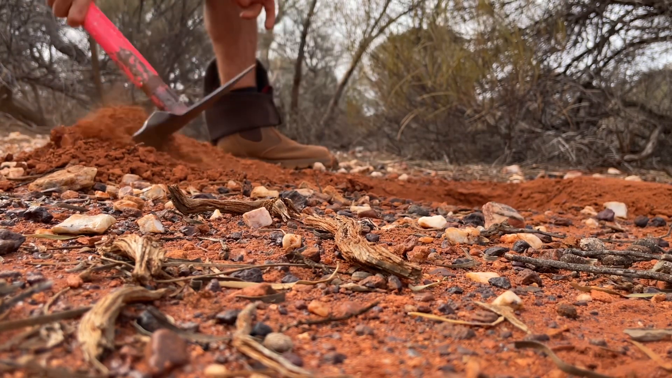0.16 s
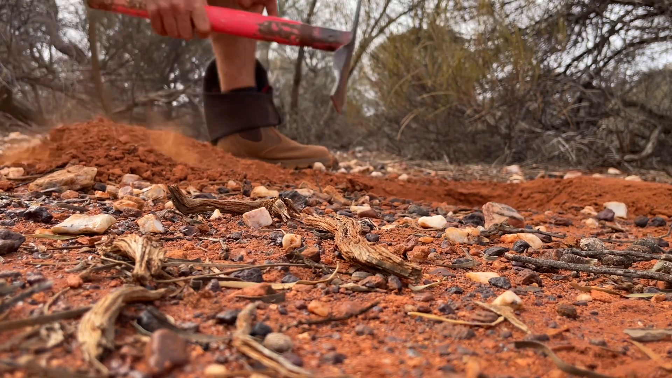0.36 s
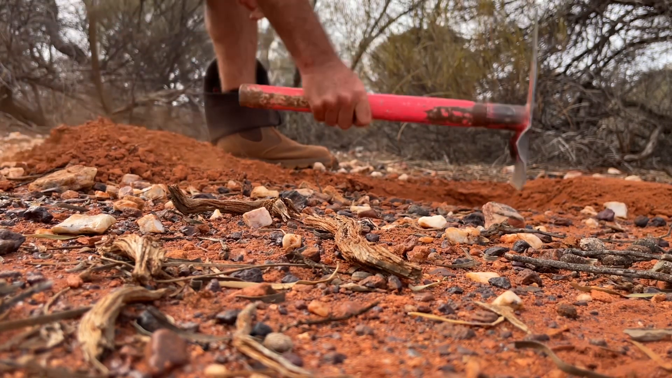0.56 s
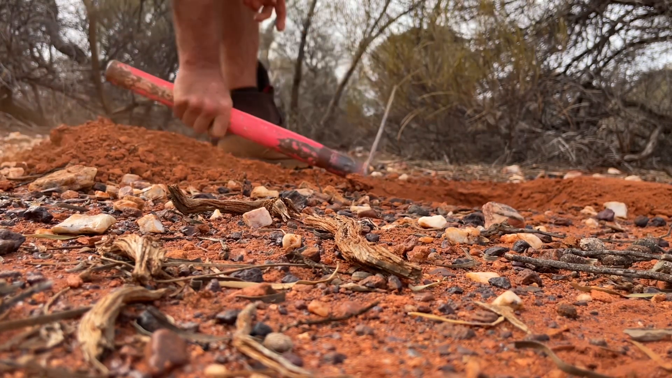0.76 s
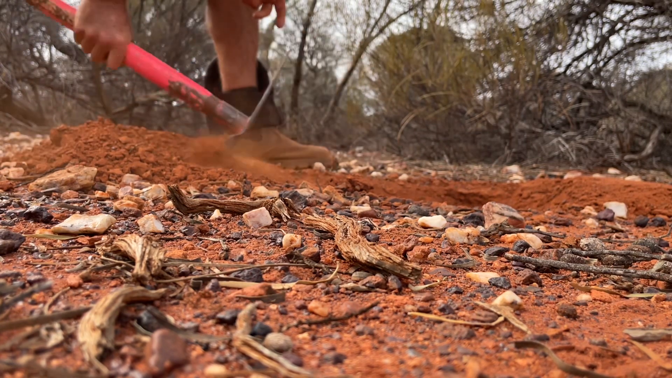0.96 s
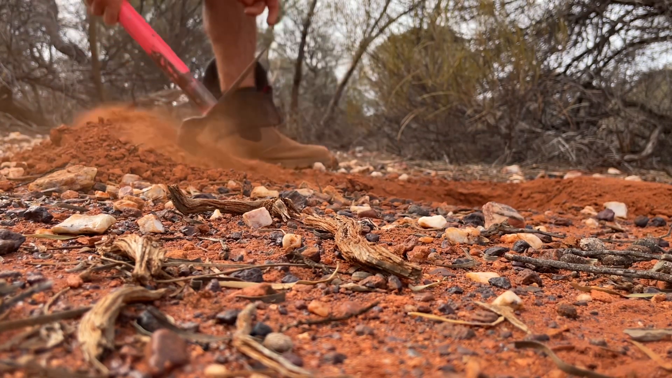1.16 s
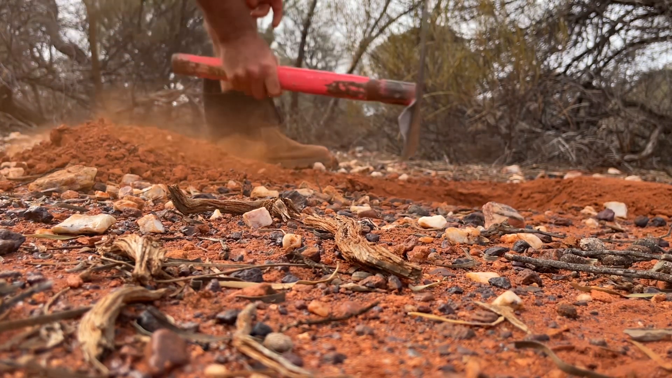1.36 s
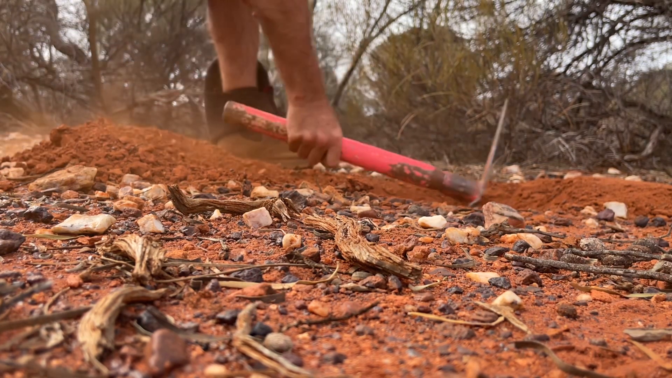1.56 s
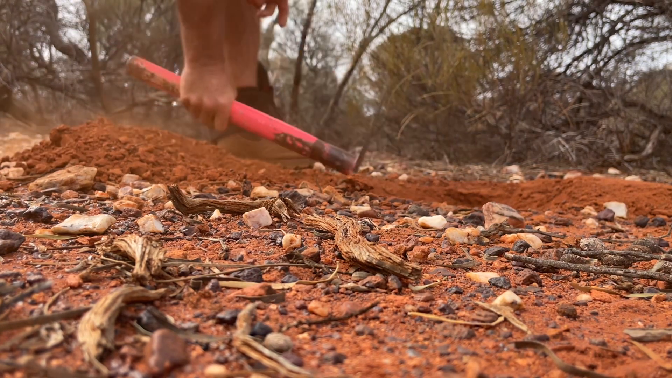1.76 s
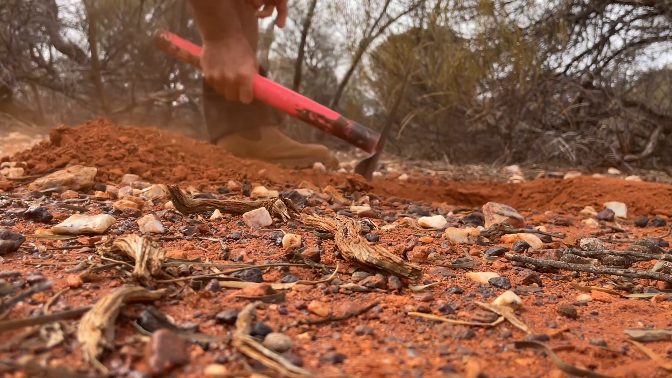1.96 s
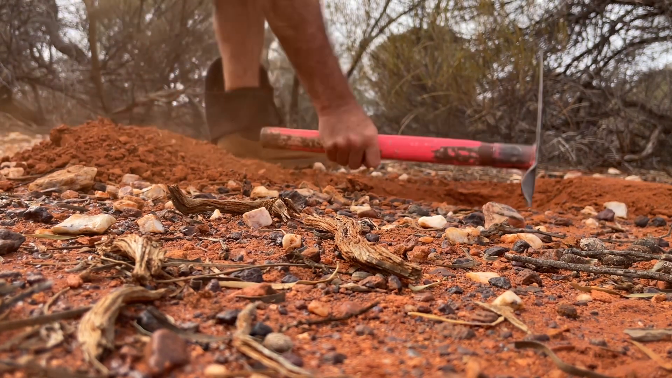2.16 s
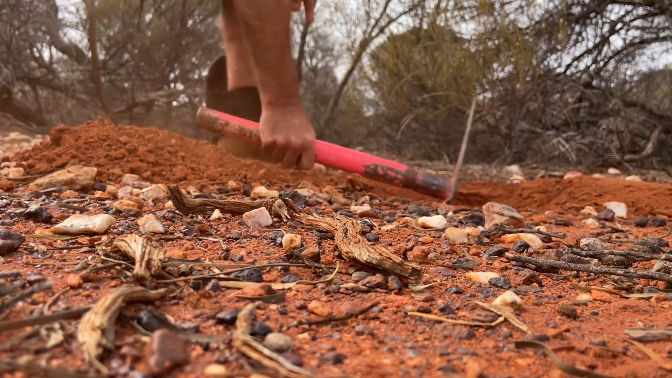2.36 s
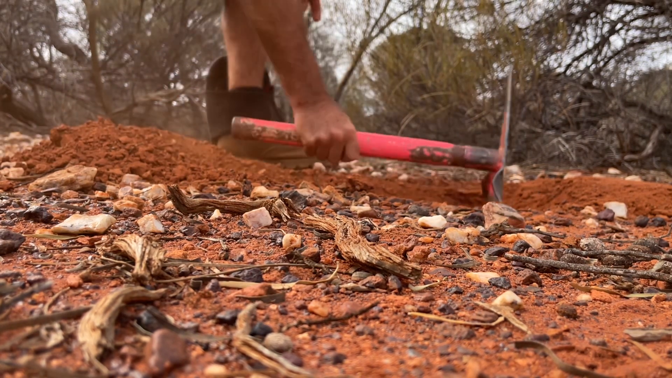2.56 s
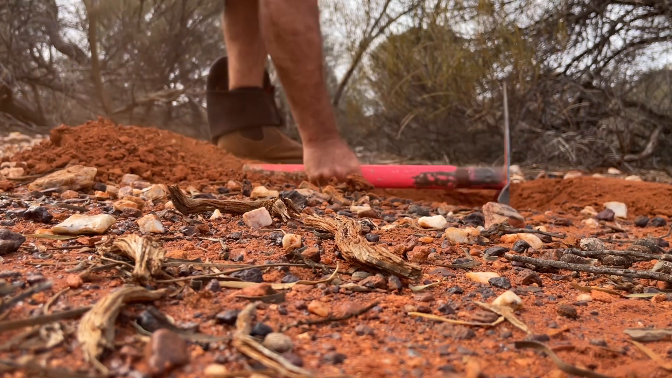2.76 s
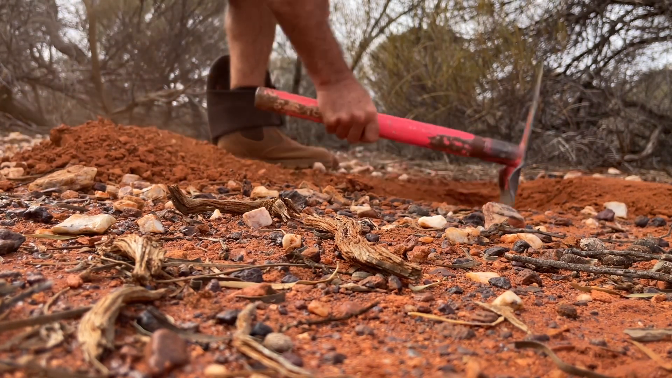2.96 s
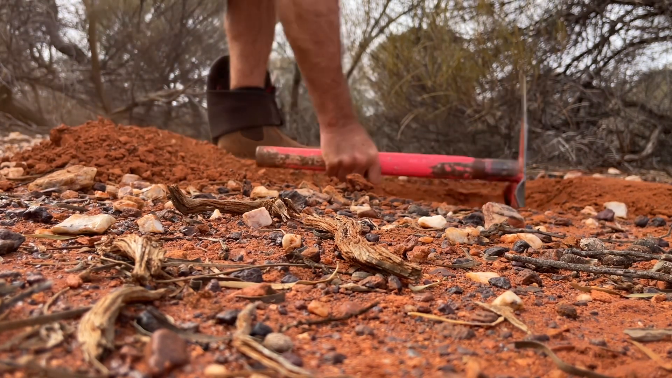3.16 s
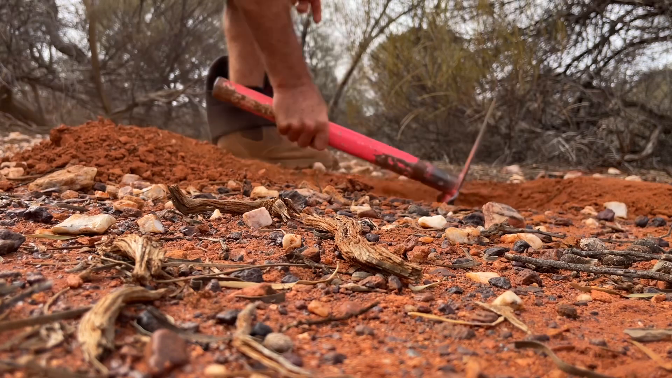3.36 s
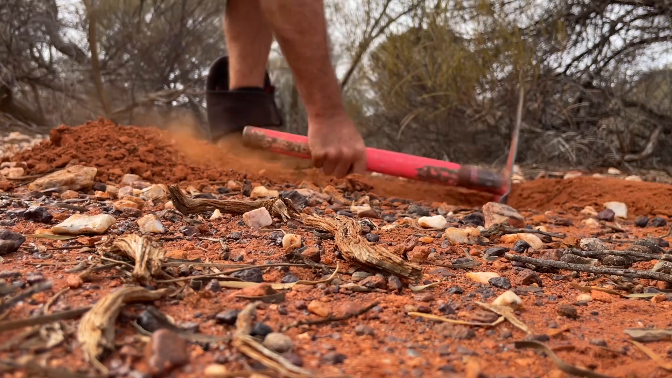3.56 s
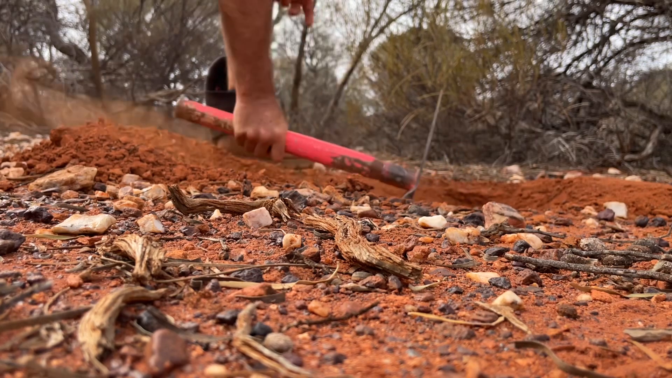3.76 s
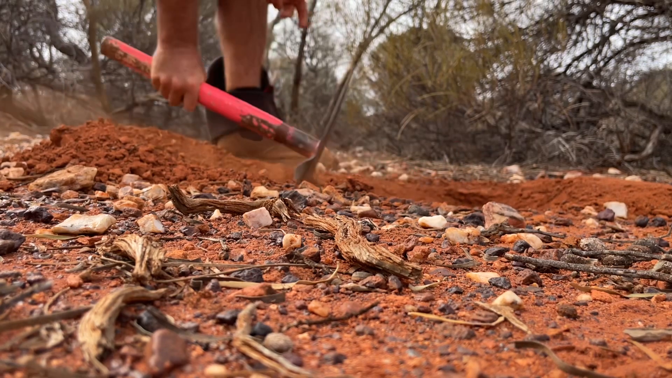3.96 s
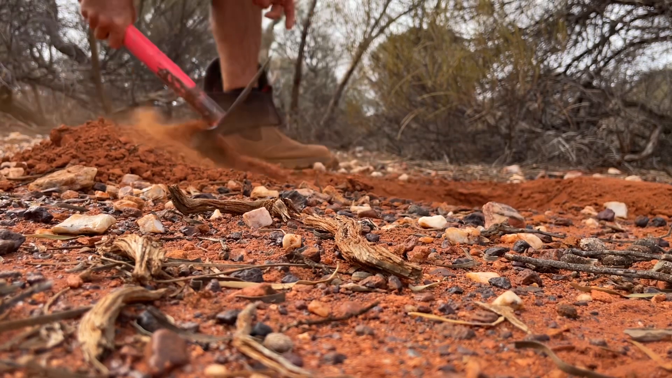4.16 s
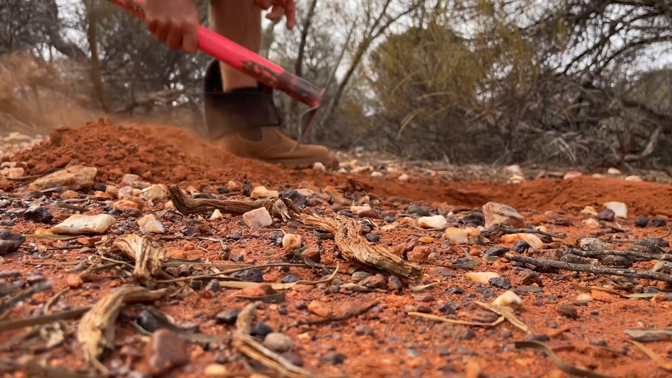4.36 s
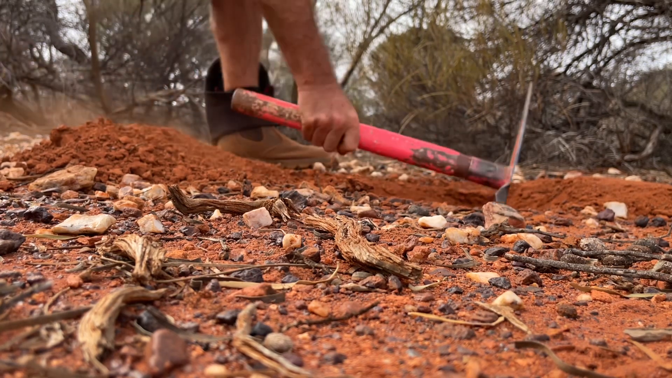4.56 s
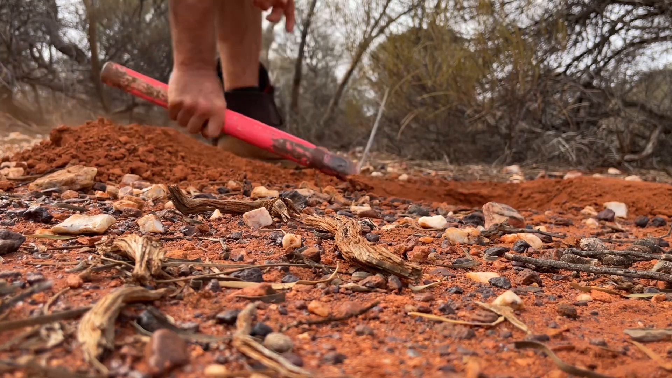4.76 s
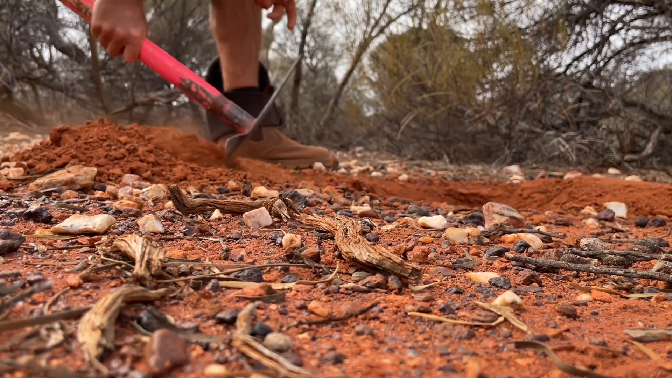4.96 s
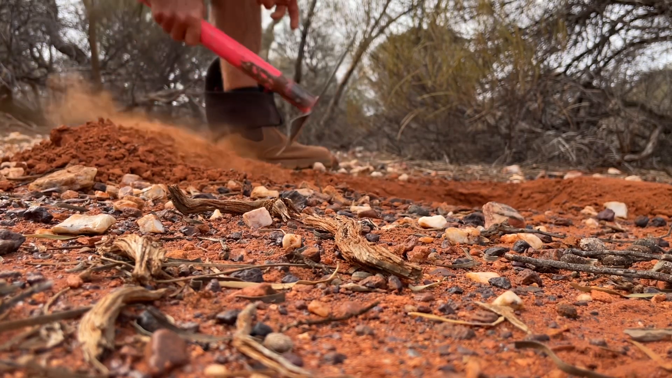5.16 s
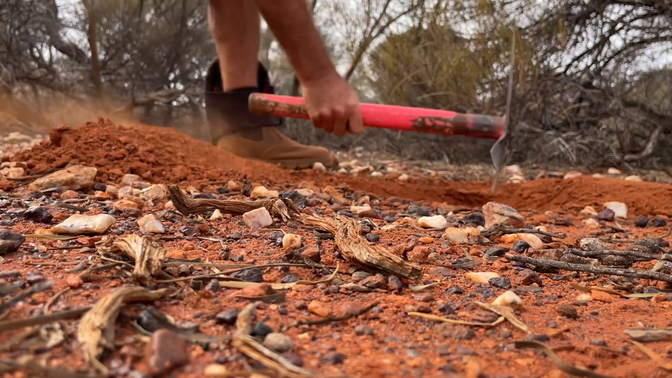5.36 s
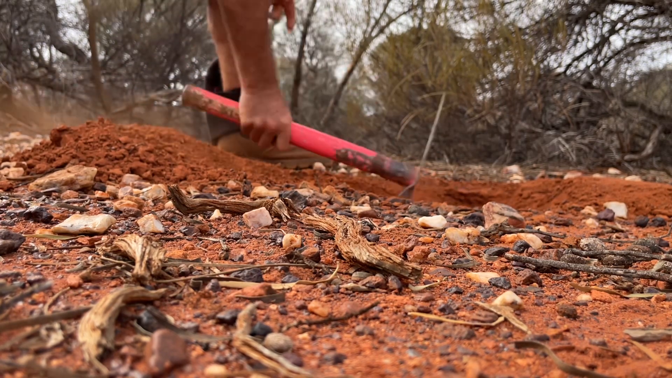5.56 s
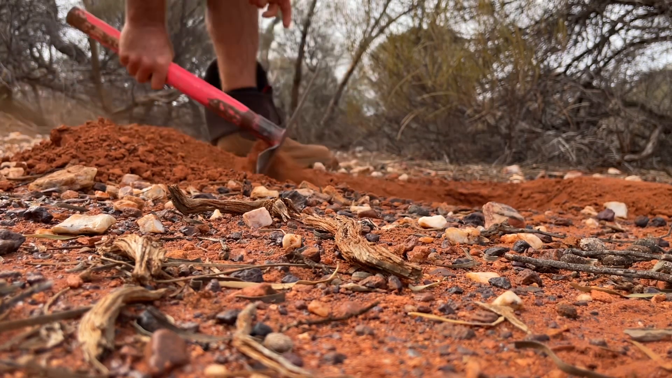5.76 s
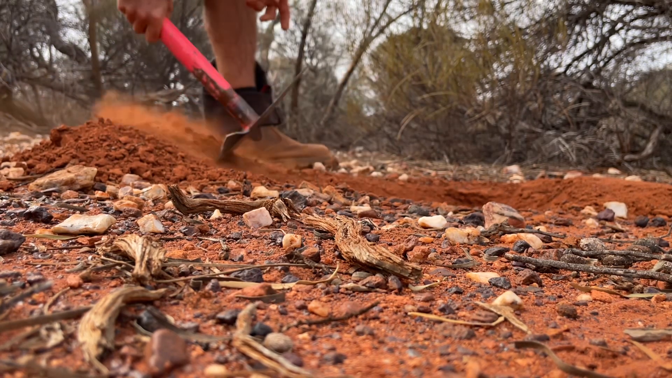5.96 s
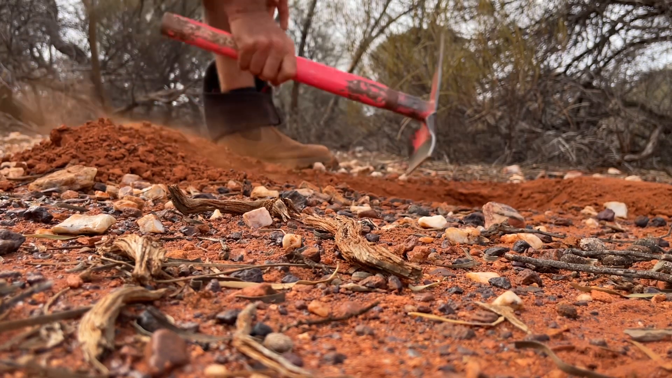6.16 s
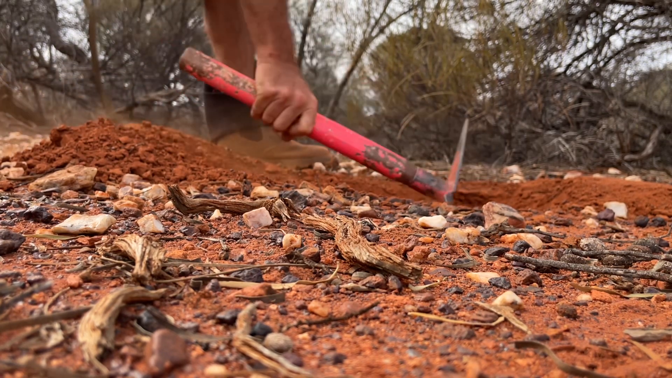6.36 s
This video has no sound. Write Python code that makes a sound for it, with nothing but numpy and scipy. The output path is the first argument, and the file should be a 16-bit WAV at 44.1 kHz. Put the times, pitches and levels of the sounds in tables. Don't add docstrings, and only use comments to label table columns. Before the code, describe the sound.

Close to the ground outdoors, a steel pick works dry stony soil. A pull fades out, then two long scraping strokes come about a second apart, three short chops, and four more pulls, the last still dragging. Blows thump low, stones knock and clink sharply on the blade, clods crunch. Between strokes come pebble ticks, trickling sand and a dull distant rumble.

```python
import sys
import numpy as np
from scipy import signal
from scipy.fft import rfft, irfft, next_fast_len
from scipy.io import wavfile
from scipy.ndimage import uniform_filter1d

SR = 44100
rng = np.random.default_rng(int(sys.argv[2]) if len(sys.argv) > 2 else 0)


def amplitude_ratio(level_db):
    exponent = np.asarray(level_db, float) / 20
    return 10 ** exponent


def generate_wav(sig):
    pcm = np.round(np.clip(np.atleast_2d(sig).T, -1, 1) * 32767).astype(np.int16)
    wavfile.write(sys.argv[1], SR, pcm)


N = 286644
TIME = np.arange(N) / SR


def unit(x):
    return x / np.sqrt(np.mean(x ** 2) + 1e-20)


def along(points, hz):
    f, v = np.transpose(points)
    return np.interp(np.log(hz + 1), np.log(f + 1), v)


def wobble(depth_db, rate):
    knots = rng.standard_normal(400)
    return np.interp(TIME * rate, np.arange(len(knots)), amplitude_ratio(depth_db * knots), period=len(knots))


def coloured(x, points):
    size = 4096
    cepstrum = irfft(np.log(amplitude_ratio(along(points, np.fft.rfftfreq(size, 1 / SR)))))
    cepstrum[1:size // 2] *= 2
    cepstrum[size // 2 + 1:] = 0
    pulse = irfft(np.exp(rfft(cepstrum)))
    return signal.oaconvolve(x, pulse[None] / np.linalg.norm(pulse), axes=1)[:, :N]


def resonate(x, hz, width_hz):
    return signal.lfilter(*signal.iirpeak(hz, hz / width_hz, SR), x)


def lowpass(x, order, hz):
    return signal.sosfilt(signal.butter(order, hz, fs=SR, output="sos"), x)


def body(force, modes, shift_db, rate):
    power = sum(amplitude_ratio(2 * db) * width for _, width, db in modes) * np.pi / SR
    total = 0
    for k, (hz, width, db) in enumerate(modes):
        swing = amplitude_ratio(db) * resonate(force * wobble(shift_db, rate), hz, width)
        total = total + (-1) ** k * swing
    return total / np.sqrt(power)


def grains(rate, spread_db, life_s, bed):
    sizes = (rng.random(N) < rate / SR) * amplitude_ratio(spread_db * rng.exponential(size=N))
    puffs = signal.lfilter([1], [1, -np.exp(-1 / (life_s * SR))], sizes)
    return unit((unit(puffs) + bed) * rng.standard_normal((2, N)))


def patchy(x, depth_db):
    z = signal.stft(x, nperseg=256)[2]
    field = uniform_filter1d(rng.standard_normal(z.shape[1:]), size=5, axis=0)
    field = uniform_filter1d(field, size=4, axis=1)
    return signal.istft(z * amplitude_ratio(depth_db * unit(field)), nperseg=256)[1][:, :N]


def tones(rows, rise_s, sag=0, sag_s=1, rough=0):
    out, t = np.zeros(N + SR), np.arange(SR // 2) / SR
    for s, hz, db, t60 in rows:
        u = t[:round(min(1.5 * t60, .5) * SR)]
        drift = 0
        if rough:
            drift = rough * np.cumsum(rng.standard_normal(len(u))) / np.sqrt(SR)
        turns = hz * (u + sag * sag_s * (1 - np.exp(-u / sag_s))) + drift
        swell = 1 - np.exp(-(u / rise_s) ** 2)
        out[round(s * SR):][:len(u)] += amplitude_ratio(db - 60 * u / t60) * swell * np.sin(2 * np.pi * turns)
    return out[:N]


def pick():
    # (frequency [Hz], width [Hz], level [dB])
    blade_modes = [(1160, 90, -7), (1555, 55, -3), (2110, 130, -12), (2345, 28, -4), (2790, 160, -8),
                   (3015, 40, -2), (3275, 40, -3), (3580, 45, -6), (4260, 120, -15), (4560, 80, -14),
                   (4895, 50, -5), (5680, 45, -11), (6035, 45, -13), (6505, 50, -18), (7000, 60, -24)]
    # (frequency [Hz], width [Hz], level [dB])
    edge_modes = [(7500, 50, -1), (8330, 70, 2), (8470, 60, 1), (8980, 35, -5), (10000, 35, 0),
                  (10770, 45, -4), (10960, 50, -3), (11900, 120, -8), (12400, 90, -5), (13150, 400, -10),
                  (13750, 60, -6), (14850, 60, -5), (15520, 80, -2)]
    # (frequency [Hz], level [dB])
    edge_valleys = [(8900, 0), (9350, -14), (9850, 0), (11100, 0), (11400, -12), (11750, 0), (13900, 0),
                    (14300, -14), (14700, 0)]
    # (frequency [Hz], width [Hz], level [dB])
    shaft_modes = [(196, 37, -1), (379, 78, -0.5), (530, 181, 1.5), (617.5, 308, 0), (810, 257, -9)]
    # (frequency [Hz], level [dB])
    rasp_colour = [(300, -12.5), (800, -2), (2700, 5), (4000, 4), (5500, -6), (6800, 2), (8000, -33.5),
                   (9300, -52), (16500, -62.5)]
    # (frequency [Hz], level [dB])
    sparkle_colour = [(6000, -51.5), (8200, -7.5), (9400, 6.5), (12300, 4.5), (14300, -20), (15500, -11),
                      (17000, -49.5)]
    rub, dust, clods, soil = scrape()
    crack, shake, knock, chips, rocks = stones()
    steel = amplitude_ratio(-1.0) * body(rub + amplitude_ratio(-5.5) * shake, blade_modes, shift_db=3.5, rate=23)
    edge = body(dust + amplitude_ratio(1.0) * chips, edge_modes, shift_db=4.5, rate=16)
    edge = edge + amplitude_ratio(-13.5) * coloured(chips, sparkle_colour)
    rasp = amplitude_ratio(-11.5) * coloured(patchy(rub, depth_db=8.0) + amplitude_ratio(-10) * crack, rasp_colour)
    shaft = body(clods + amplitude_ratio(-1.5) * knock, shaft_modes, shift_db=3.0, rate=28)
    shaft = lowpass(shaft, order=2, hz=2500)
    low = lowpass(steel + rasp + rocks + shaft + soil, order=8, hz=7600)
    return low + coloured(edge, edge_valleys)


def scrape():
    # (frequency [Hz], width [Hz], level [dB])
    ground_modes = [(95, 145, -12), (163, 26, -6.5)]
    grit, crunch, rumble = drag()
    rub = amplitude_ratio(-0.5) * grit * grains(rate=360, spread_db=3.6, life_s=.002, bed=.42)
    dust = amplitude_ratio(-29) * grit ** 0.65 * grains(rate=1300, spread_db=5.0, life_s=0.0023, bed=0.76)
    clods = amplitude_ratio(-2.5) * crunch * grains(rate=280, spread_db=1.2, life_s=0.0024, bed=0.55)
    push = rumble * grains(rate=110, spread_db=-5.5, life_s=0.016, bed=1.3)
    soil = amplitude_ratio(3.5) * body(push, ground_modes, shift_db=3.0, rate=12)
    return rub, dust, clods, soil


def drag():
    # (time [s], pressure [dB])
    first_pull = [(0, -37.5), (.095, -48.5), (.115, -64), (.22, -67)]
    # (time [s], pressure [dB])
    long_pulls = [
        [(0.585, -39), (0.639, -43), (0.757, -31.5), (0.787, -32), (0.835, -41), (0.969, -50), (1.08, -64.5)],
        [(1.478, -55), (1.538, -39.5), (1.656, -39), (1.688, -40.5), (1.806, -38), (1.86, -65)],
        [(3.535, -41), (3.565, -46.5), (3.63, -44), (3.66, -49.5), (3.74, -46.5), (3.833, -37), (3.951, -44.5),
         (3.995, -43.5), (4.035, -49)],
        [(4.058, -40.5), (4.112, -47.5), (4.165, -60.5)],
        [(4.536, -59.5), (4.604, -41.5), (4.708, -38.5), (4.75, -30), (4.792, -42), (4.928, -45), (5.06, -68.5)],
        [(5.412, -41.5), (5.47, -44), (5.588, -39), (5.618, -34.5), (5.672, -36), (5.816, -47), (5.93, -72.5)],
        [(6.286, -46.5), (6.348, -42), (6.472, -35.5), (6.497, -29)],
    ]
    # (time [s], pressure [dB])
    short_chops = [
        [(2.145, -48), (2.225, -41), (2.3, -46), (2.335, -82), (2.358, -48.5), (2.39, -73), (2.408, -84),
         (2.425, -57.5), (2.46, -82)],
        [(2.683, -37), (2.74, -47), (2.775, -42), (2.815, -59.5), (2.845, -74), (2.87, -60), (2.92, -81)],
        [(3.106, -33.5), (3.14, -44), (3.22, -40), (3.255, -45), (3.28, -66.5), (3.33, -71.5)],
    ]
    # (more crunch [dB], more rumble [dB])
    depths = [(-4, -6.5), (2, 3), (3, -0.5), (5, 1), (0, -15), (1.5, -1.5), (2, -1), (-3.5, 1.5), (6, 4.5),
              (6, 5.5), (2.5, 2)]
    grit_db, crunch_db, rumble_db = -4.5, 6, 2
    crunch_grows, rumble_grows, usual_db = 1, 0.99, -35
    rumble_lag_s = 0.02
    gains = np.zeros((3, N))
    for rows, (deep_crunch_db, deep_rumble_db) in zip([first_pull, *long_pulls, *short_chops], depths):
        s, push_db = np.transpose(rows)
        start = np.clip((TIME - s[0]) / .009 + (s[0] == 0), 0, 1)
        stop = np.clip((s[-1] + .02 - TIME) / .02, 0, 1)
        now = np.interp(TIME, s, push_db - usual_db)
        late = np.interp(TIME - rumble_lag_s, s, push_db - usual_db)
        levels = np.array([grit_db + now,
                           crunch_db + deep_crunch_db + crunch_grows * now,
                           rumble_db + deep_rumble_db + rumble_grows * late])
        gains += start * stop * amplitude_ratio(usual_db + levels)
    return gains


def stones():
    snap_db, snap_s = 4.5, .00013
    t = np.arange(SR // 16) / SR
    crack, shake, knock, chips, own = np.zeros((5, 2, N + len(t)))
    for s, db, knock_db, stone_hz, sparkle_db in contacts():
        rise_s = 0.0025 * amplitude_ratio(-.45 * (db + 31.0))
        swell = (1 - np.exp(-t / rise_s)) * (1 + rise_s / 0.0022)
        burst = amplitude_ratio(db - 60 * t / 0.023) * swell * rng.standard_normal((2, len(t)))
        burst[0] += amplitude_ratio(db + snap_db) * (1 - t / snap_s) * np.exp(-t / snap_s)
        at = slice(round(s * SR), round(s * SR) + len(t))
        crack[:, at] += burst
        shake[:, at] += amplitude_ratio(-.25 * (db + 38.5)) * burst
        knock[:, at] += amplitude_ratio(knock_db) * burst
        chips[:, at] += amplitude_ratio(sparkle_db) * burst
        own[:, at] += resonate(resonate(burst, stone_hz, width_hz=540), stone_hz, width_hz=540)
    return crack[:, :N], shake[:, :N], knock[:, :N], chips[:, :N], amplitude_ratio(3) * own[:, :N]


def contacts():
    # (time [s], peak [dB], pitch [Hz], edge sparkle [dB])
    flint_hits = [(0.586, -35, 1500, -41), (0.906, -23, 3240, -42), (0.9355, -20.5, 3260, -35.5),
                  (1.4803, -29, 4960, -50), (2.146, -40, 1250, -52.5), (2.6832, -21.5, 3620, -34.5),
                  (3.1055, -21, 1140, -33.5), (3.142, -39, 3230, -41), (3.17, -12.5, 2430, -41.5),
                  (3.5345, -27, 1500, -43), (3.6802, -27.5, 1550, -59), (3.8058, -17.5, 4900, -34.5),
                  (4.016, -20, 987, -44), (4.5375, -29, 3060, -46), (4.5917, -31, 5250, -47),
                  (4.7993, -18.5, 3570, -46.5), (4.917, -22.5, 3040, -43), (5.4155, -22.5, 2300, -34.5),
                  (6.2867, -30.5, 3550, -53), (6.418, -14, 3600, -43), (6.4767, -10, 1420, -43)]
    # (time [s], peak [dB], pitch [Hz])
    stone_hits = [(0.071, -35, 1230), (0.6442, -28, 3260), (0.6669, -20, 3040), (0.7298, -28, 4800),
                  (0.7631, -7, 1520), (0.7832, -10.5, 3270), (1.6107, -23, 1600), (1.6497, -18, 1570),
                  (1.6914, -27, 3260), (1.7475, -11.5, 2300), (1.784, -24.5, 3650), (2.4176, -39.5, 910),
                  (3.115, -20, 2070), (3.2025, -19.5, 1840), (3.2195, -24, 1850), (3.8781, -6.5, 3020),
                  (4.0637, -35, 1710), (4.085, -25.5, 970), (4.097, -30.5, 1630), (4.125, -34.5, 1440),
                  (4.139, -37, 1720), (2.241, -30, 1150), (2.216, -38, 3680), (4.71, -13, 1800),
                  (4.7533, -1.5, 1560), (4.7611, -5.5, 1490), (5.5498, -39, 1540), (5.5712, -19.5, 4960),
                  (5.594, -22, 2900), (5.635, 0, 2046), (5.6566, -28, 1220), (6.326, -28.5, 3280),
                  (6.3755, -14.5, 5030)]
    # (time [s], peak [dB], pitch [Hz])
    gravel_hits = [(0.6975, -35, 2360), (0.7157, -34, 2360), (0.834, -26.5, 3300), (0.8586, -35, 3030),
                   (1.5463, -29, 3610), (1.5702, -26, 3560), (1.596, -26, 1460), (1.6357, -20, 1780),
                   (1.6747, -25, 4930), (2.194, -41, 3270), (2.3046, -38, 1240), (3.5744, -31.5, 2380),
                   (3.6194, -33, 1190), (3.6656, -33.5, 1560), (3.704, -38, 3050), (3.8495, -30.5, 3300),
                   (3.8712, -22, 2960), (3.9242, -42.5, 1140), (4.109, -28, 1110), (4.5476, -25.5, 3060),
                   (4.6146, -28, 3600), (4.6768, -33, 1260), (4.7333, -20, 1530), (4.779, -24, 3000),
                   (4.8352, -36.5, 1590), (4.8808, -24, 2940), (5.4604, -29, 3620), (5.4784, -31, 3630),
                   (5.69, -39, 3010), (5.728, -25, 2780), (5.8344, -36.5, 1100), (6.3994, -22, 3580),
                   (6.448, -17, 3250)]
    # (time [s], peak [dB], pitch of their grit [Hz])
    clod_bursts = [(0.0458, -38, 1430), (0.598, -26.5, 1200), (0.7508, -27, 3340), (0.8155, -34.5, 3220),
                   (0.9717, -36.5, 1180), (1.516, -36, 1070), (1.6264, -19.5, 1660), (1.707, -18.5, 3120),
                   (1.8103, -32, 2350), (2.1837, -50, 1250), (2.2529, -24.5, 3670), (2.3498, -40, 5160),
                   (2.7755, -38, 2520), (3.33, -52, 1220), (3.7556, -26.5, 2800), (3.8228, -20, 3150),
                   (3.9035, -22, 1060), (3.9495, -20, 1000), (4.8594, -23.5, 1660), (5.7897, -45, 3070),
                   (6.3609, -28, 1320)]
    flint_knock_db, stone_knock_db, clod_knock_db = -3, -4.5, 9
    knock_grows, gravel_db = 0.57, -1
    stone_sparkle_db, clod_sparkle_db = -55, -77.5

    def to_shaft(db, share_db):
        return share_db + (knock_grows - 1) * (db + 8.0)

    blows = []
    for s, db, hz, edge_db in flint_hits:
        blows.append((s, db, to_shaft(db, flint_knock_db), hz, edge_db - db))
    for s, db, hz in stone_hits:
        blows.append((s, db, to_shaft(db, stone_knock_db), hz, stone_sparkle_db - db))
    for s, db, hz in gravel_hits:
        blows.append((s, db + gravel_db, stone_knock_db, hz, stone_sparkle_db - db))
    for s, db, hz in clod_bursts:
        blows.append((s, db, clod_knock_db, hz, clod_sparkle_db - db))
    return blows


def blade_rings():
    # (time [s], frequency [Hz], level [dB], t60 [s])
    free_rings = [(.155, 3040, -55, 0.27), (.16, 2360, -56.5, 0.26), (.165, 4900, -58, .08),
                  (.165, 6035, -54, .08), (.595, 5010, -29.5, 0.037), (.62, 3270, -41, 0.44),
                  (.80, 3230, -37, 0.34), (1.69, 2360, -35, 0.17), (1.78, 6520, -55, 0.18),
                  (2.855, 4900, -59, 0.16), (4.13, 5700, -57, .08), (5.045, 2250, -57.5, .08),
                  (6.18, 3550, -52, .025), (.035, 6540, -52, .2), (.04, 6035, -51, .2),
                  (0, 2400, -49, 0.41), (5.635, 1500, -20, .03), (3.605, 1167, -39.5, 0.12),
                  (4.538, 6500, -37.5, 0.071), (4.92, 4764, -27, 0.034), (.73, 4900, -33, 0.05),
                  (.765, 6500, -43, 0.083), (1.63, 4900, -32, 0.078), (1.688, 4900, -40, .1),
                  (3.88, 4870, -34.5, 0.11), (5.415, 3070, -32.5, .12), (6.36, 2394, -41.5, 1),
                  (6.42, 3660, -25, 0.12), (4.765, 2994, -32, 0.17)]
    # (time [s], frequency [Hz], level [dB], t60 [s])
    more_rings = [ (1.07, 2480, -68, 0.22), (1.81, 2346, -38.5, 0.2), (1.86, 3320, -78.5, 0.97),
                  (2.43, 3015, -57, 0.42), (2.43, 4910, -41, 0.099), (2.432, 3600, -47, 0.079),
                  (2.25, 3380, -37, 0.099), (2.2, 5690, -51, 0.17), (5.452, 3620, -43, 0.2),
                  (5.46, 6035, -45, 0.18), (5.5, 2345, -45, 0.25), (2.855, 3010, -65.5, .8),
                  (2.885, 3270, -60, 0.42), (4.135, 2350, -51.5, 0.23), (1.652, 6035, -41, 0.29),
                  (1.7, 5860, -44, 0.068), (1.785, 6000, -45, 0.21), (1.8, 5640, -43, 0.13),
                  (2.285, 4920, -38.5, 0.085), (2.7, 3330, -38.5, 0.21), (3.808, 6030, -30, 0.078),
                  (5.574, 4870, -34.5, 0.19), (5.575, 6020, -30, 0.051), (5.634, 4260, -0.5, 0.011),
                  (4.765, 3580, -25.5, 0.095)]
    rings = tones(free_rings + more_rings, rise_s=0.0017, rough=0.81)
    return np.array([rings, .5 * np.roll(rings, shift=4)])


def shaft_knocks():
    # (time [s], peak [dB], pitch [Hz])
    jars = [(0.042, -27, 597), (0.602, -26.5, 382), (0.644, -30.5, 434), (0.668, -21, 600),
            (0.718, -25.5, 440), (0.755, -21, 394), (0.764, -10, 530), (0.785, -17.5, 503),
            (0.813, -21, 364), (0.873, -37.5, 360), (0.907, -29, 396), (1.483, -27, 333), (1.52, -28, 304),
            (1.572, -24, 610), (1.628, -12.5, 560), (1.652, -32, 360), (1.709, -29, 594),
            (1.746, -10.5, 529), (1.78, -35, 563), (1.81, -31, 389), (2.182, -25.5, 286), (2.224, -32, 299),
            (2.252, -18, 550), (2.284, -28, 563), (2.772, -23, 343), (3.111, -14, 534), (3.171, -19, 550),
            (3.327, -38.5, 348), (3.535, -26, 500), (3.617, -26.5, 564), (3.645, -31.5, 363),
            (3.681, -24.5, 386), (3.758, -22, 369), (3.789, -24, 390), (3.807, -22.5, 398),
            (3.824, -22, 362), (3.876, -13, 546), (3.905, -19, 385), (3.948, -25, 368), (3.994, -23.5, 377),
            (4.066, -44, 385), (4.609, -30, 405), (4.64, -21.5, 398), (4.657, -18.5, 413),
            (4.709, -13.5, 630), (4.753, -10, 530), (4.801, -29.5, 460), (4.863, -22.5, 375),
            (5.415, -26.5, 302), (5.551, -25.5, 600), (5.635, -21, 502), (5.69, -27.5, 398),
            (5.72, -28, 358), (5.762, -20.5, 376), (6.329, -23, 410), (6.376, -15.5, 493),
            (6.417, -28.5, 405), (6.449, -24, 530), (6.479, -21, 560)]
    cycles, lead_s, ring_db = 20.5, .002, 2
    rows = [(s - lead_s, hz, db + ring_db, cycles / hz) for s, db, hz in jars]
    knocks = tones(rows, rise_s=0.0033, sag=0.19, sag_s=.004)
    return np.array([knocks, .7 * np.roll(knocks, shift=24)])


def ground_thumps():
    # (time [s], peak [dB], pitch [Hz])
    ground_blows = [(0.156, -45, 135), (0.597, -19, 176), (0.701, -20, 136), (0.779, -29, 167),
                    (0.975, -30, 158), (1.488, -23.5, 97), (1.639, -23, 163), (1.721, -14.5, 164),
                    (2.153, -12.5, 112), (2.355, -32, 142), (2.688, -7.5, 153), (3.111, -12.5, 144.4),
                    (3.169, -10.5, 158.4), (3.48, -39, 93), (3.541, -17, 116.7), (3.877, -10.5, 179.4),
                    (4.547, -14.5, 172), (4.614, -28, 193), (4.681, -20, 137), (4.749, -40, 150),
                    (5.064, -27, 88.5), (5.425, -29.5, 135.8), (5.647, -21, 104), (5.559, -28, 194.6),
                    (5.648, -14, 190), (5.742, -15, 186), (2.185, -23, 151), (5.19, -40, 52.2),
                    (4.25, -46, 55.2), (1.76, -24.5, 118.3), (0.999, -39.5, 60), (6.292, -10.5, 157),
                    (6.375, -16.5, 196)]
    cycles = 4.76
    rows = [(s, hz, db + 11, cycles / hz) for s, db, hz in ground_blows]
    thumps = tones(rows, rise_s=0.0071, sag=1, sag_s=0.0021)
    return np.array([thumps, .7 * np.roll(thumps, shift=65)])


def pebbles():
    # (time [s], peak [dB])
    drops = [
        (.1614, -48),
        (1.061, -69),
        (1.196, -51),
        (4.29, -49.5),
        (4.365, -57.5),
        (5.045, -56.5),
        (6.009, -35.5),
    ]
    # (frequency [Hz], level [dB])
    tick_colour = [(300, -17), (1000, 10), (4000, 1), (9000, -3), (14000, -1), (16500, -34)]
    t60_s, rise_s = .014, .0007
    out, t = np.zeros((2, N + SR)), np.arange(SR // 32) / SR
    for s, db in drops:
        shape = amplitude_ratio(db - 60 * t / t60_s) * (1 - np.exp(-t / rise_s))
        out[:, round(s * SR):][:, :len(t)] += shape * rng.standard_normal((2, len(t)))
    return coloured(out[:, :N], tick_colour)


def trickling_sand():
    # (fullest at [s], level [dB], half-length [s])
    spills = [(0.04, -76.5, 0.26), (0.413, -85.5, 0.17), (.8, -72, 0.17), (1.437, -75, 0.22),
              (1.7, -85, 0.23), (2.32, -73.5, 0.17), (2.653, -76, 0.079), (2.813, -75, 0.1),
              (3.418, -81.5, 0.085), (3.792, -78.5, 0.37), (4.805, -76.5, 0.29), (5.197, -89, .15),
              (5.756, -76.5, 0.25), (6.095, -74, 0.18), (6.447, -59, 0.1)]
    # (frequency [Hz], level [dB])
    sand_colour = [(900, -2.5), (2100, -5.5), (3200, -14), (4700, -7), (6200, -3), (9000, -4.5),
                   (12500, -26), (15000, -14.5), (16200, -42.5)]
    edge_db = -10
    flow = sum(amplitude_ratio(db + edge_db * ((TIME - s) / half_s) ** 2) for s, db, half_s in spills)
    sand = patchy(grains(rate=1100, spread_db=2.5, life_s=.002, bed=1.6), depth_db=3.5)
    return amplitude_ratio(13.0) * flow * coloured(sand, sand_colour)


def background():
    # (time [s], level [dB])
    rumble_levels = [(0, -56.5), (1.1, -60), (1.45, -57), (1.95, -63), (2.6, -58), (3.0, -61.5),
                     (3.45, -56.5), (4.5, -61), (5.05, -59.5), (6.25, -59)]
    # (frequency [Hz], level [dB])
    far_colour = [(25, -2), (60, 4.5), (130, 2), (260, -5), (700, -4), (1000, -13), (1700, -24),
                  (3200, -34.5), (6000, -40)]
    level = amplitude_ratio(np.interp(TIME, *np.transpose(rumble_levels)) + 6.5) * wobble(depth_db=1.0, rate=9)
    far = level * coloured(rng.standard_normal((2, N)), far_colour)
    hiss = amplitude_ratio(-95.5) * rng.standard_normal((2, N))
    return far + hiss


def scene():
    near = pick() + blade_rings() + shaft_knocks() + ground_thumps()
    return near + pebbles() + trickling_sand() + background()


def band_limit(x):
    return signal.sosfilt(signal.butter(12, 16510, fs=SR, output="sos"), x)


def record(dry):
    # (frequency [Hz], level [dB])
    response = [(20, -14.5), (45, -9.5), (90, 0.5), (15800, 2), (16100, -22.5), (16600, -42.5)]
    # (frequency [Hz], correlation [0-1])
    likeness = [(30, .8), (60, .92), (300, .9), (1000, .89), (2500, .66), (5000, .72), (7400, .9),
                (7800, .998), (8200, .995), (8400, .95), (8700, .99), (9000, .96), (9400, .999),
                (10000, .9), (10600, .9995), (12300, .9995), (13200, .85), (14100, .9995), (14600, .995),
                (15500, .93)]
    # (frequency [Hz], phase [rad])
    left_lead = [(0, 0), (2000, .6), (2700, 1.2), (3600, .6), (5200, 1.1), (6000, -.5), (7000, -1.5),
                 (7800, -3.14), (9300, -3.14), (10600, -6.28), (12400, -6.28), (14100, -9.42),
                 (17000, -9.42)]
    # (frequency [Hz], level difference [dB])
    left_tilt = [(60, .5), (110, 1.5), (380, -.5), (1300, .5), (2800, 2), (5200, 3), (7000, 0)]
    size = next_fast_len(N + 8192)
    hz = np.fft.rfftfreq(size, 1 / SR)
    turn = np.arccos(np.clip(along(likeness, hz), 0, 1)) / 2
    shared, apart = rfft(dry, size) * amplitude_ratio(along(response, hz)) * [np.cos(turn), np.sin(turn)]
    shift = np.exp(.5j * np.interp(hz, *np.transpose(left_lead)))
    half = amplitude_ratio(along(left_tilt, hz) / 2) * shift
    ports = irfft(np.array([(shared + apart) * half, (shared - apart) / half]), size)[:, :N]
    return band_limit(ports)


dry = scene()
out = record(dry)
generate_wav(out)
```